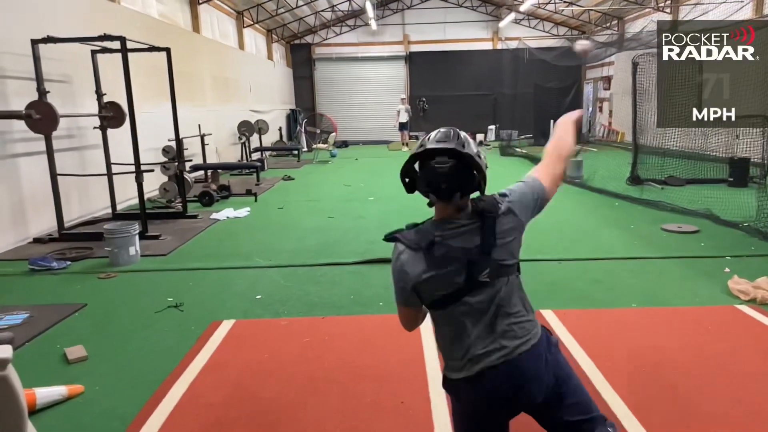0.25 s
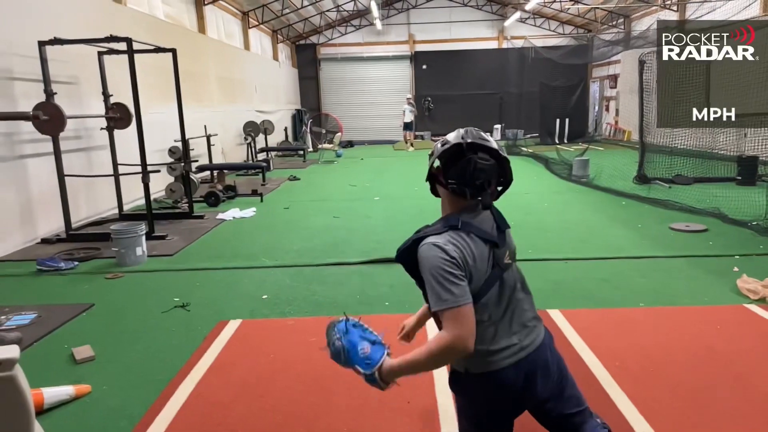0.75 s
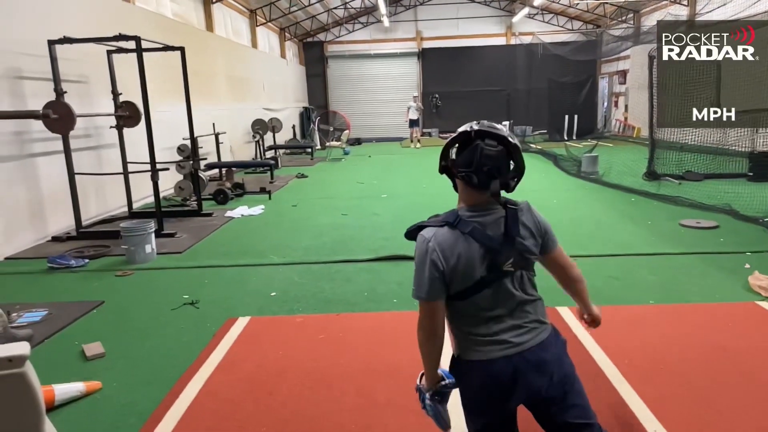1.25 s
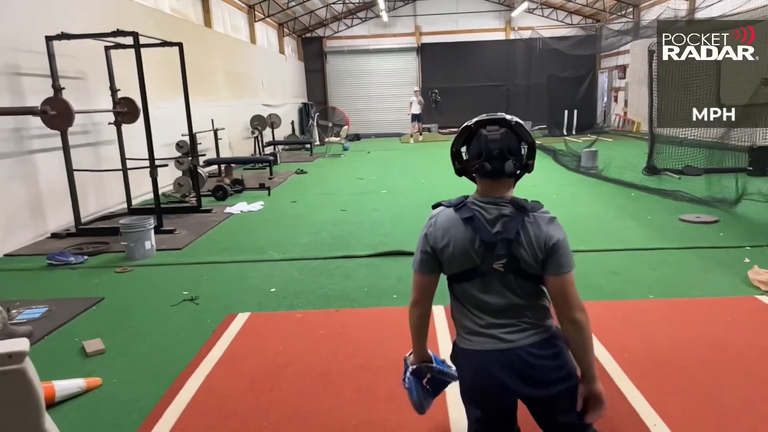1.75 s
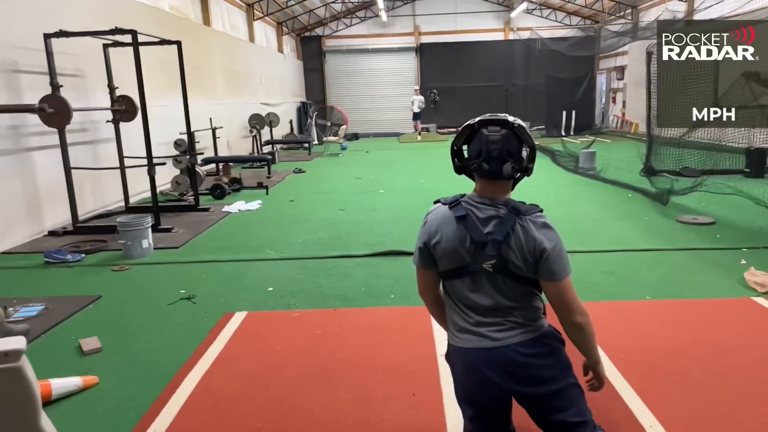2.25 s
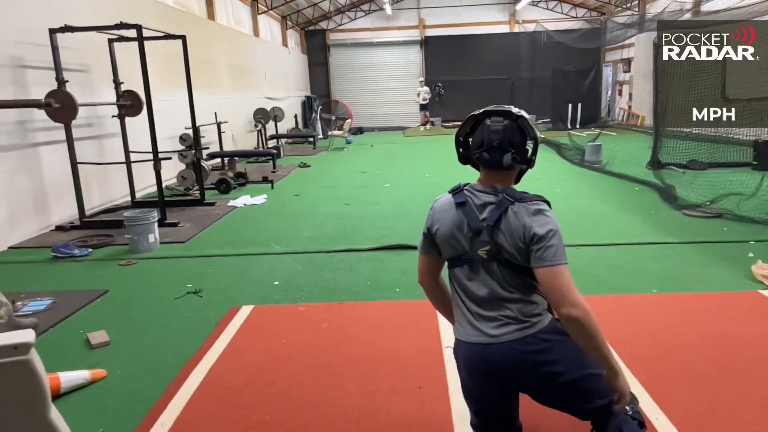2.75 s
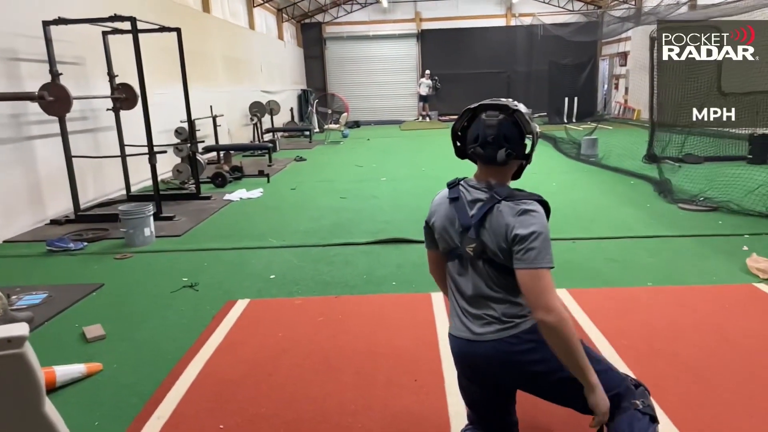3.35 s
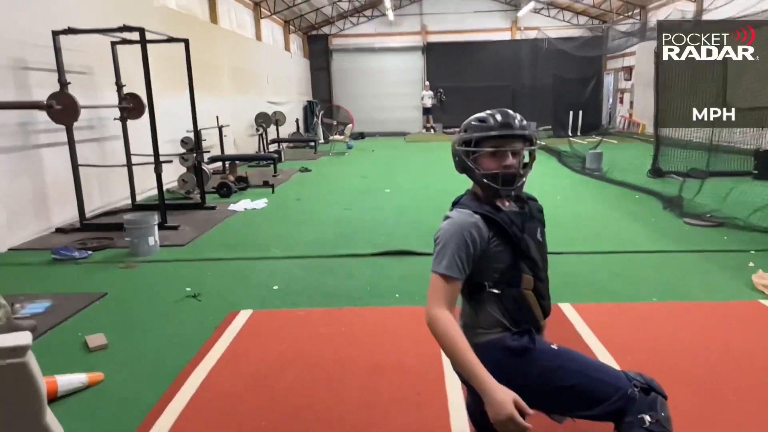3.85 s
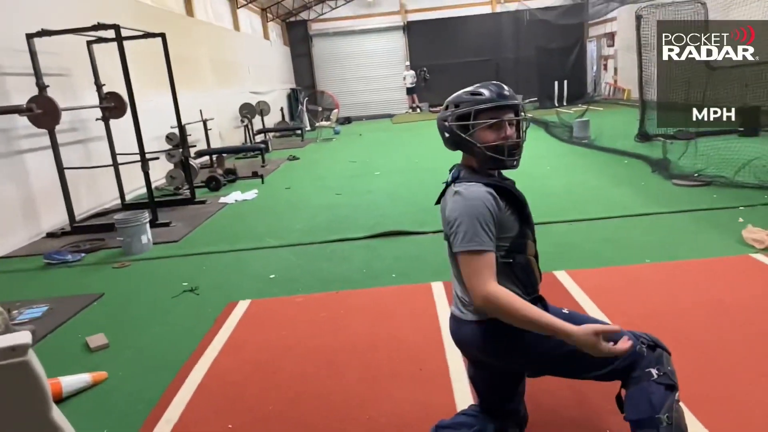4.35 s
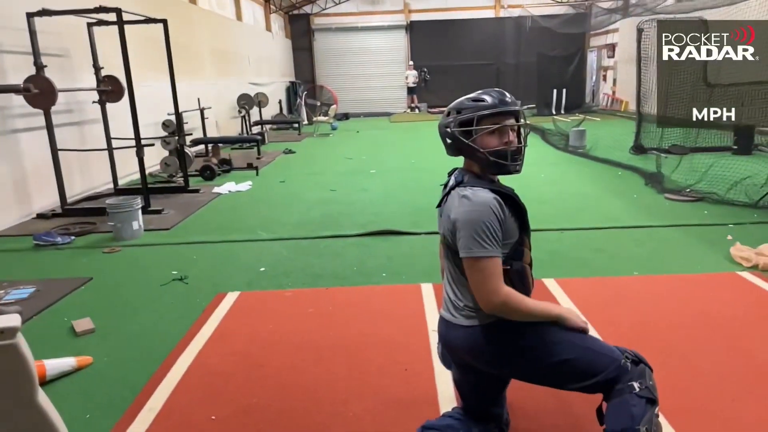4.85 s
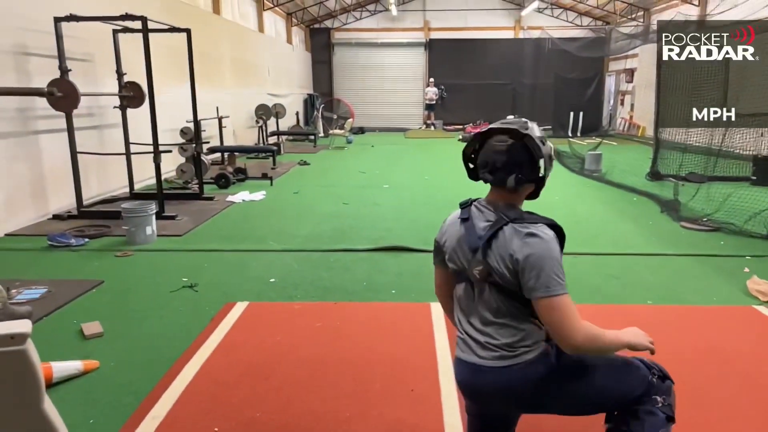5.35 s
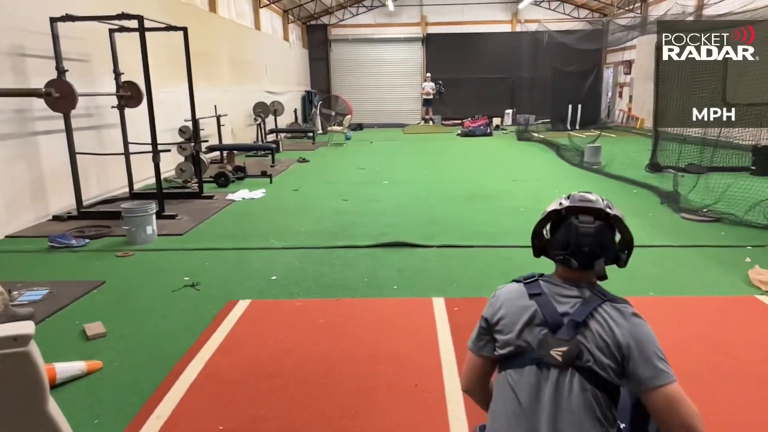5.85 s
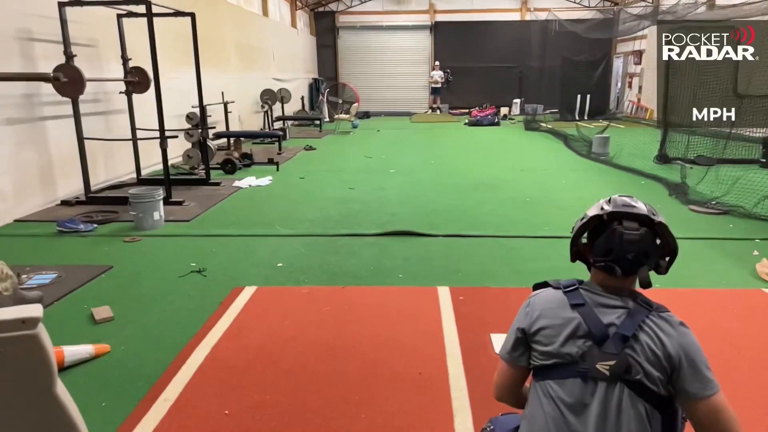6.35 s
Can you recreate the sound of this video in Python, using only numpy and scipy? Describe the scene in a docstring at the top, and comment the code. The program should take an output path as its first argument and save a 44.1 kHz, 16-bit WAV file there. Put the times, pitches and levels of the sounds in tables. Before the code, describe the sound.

Close to the microphone, plastic guards knock and clothing rustles as a catcher throws. About a second in, a baseball hits a distant leather mitt with a very loud sharp crack, and the big hall rings with quick echoes. A faint steel clink follows during a lull, then gear ticks, soft thuds and a run of light plastic knocks. Airy room noise and low engine drone continue underneath.

```python
"""Plastic guards knock and clothes rustle over hall air and engine drone; then a baseball cracks into a mitt.
The steel-roofed hall rings with the catch; steel clinks further off; the catcher throws and shifts.
Mitt: damped sines plus echoes. Steel: ringing modes plus scrape noise. Guards, buckles: decaying noise bursts.
Cloth, thuds, air, rumble: shaped noise. Engines: two gliding harmonics. The sound has brief regular gaps."""
import sys
import numpy as np
from scipy import signal
from scipy.fft import rfft, irfft, next_fast_len
from scipy.io import wavfile
from scipy.ndimage import uniform_filter1d, map_coordinates

SR = 44100
rng = np.random.default_rng(int(sys.argv[2]) if len(sys.argv) > 2 else 0)


def wrap_up_sound(samples):
    """Save the sound to the file named by the first command line argument, as 16-bit audio."""
    columns = np.atleast_2d(samples).T
    # keep every value between -1 and 1, then stretch to whole-number steps
    tamed = np.clip(columns, -1, 1)
    steps = np.round(tamed * 32767).astype(np.int16)
    wavfile.write(sys.argv[1], SR, steps)


N = 290442


def amp(db):
    """Decibels to gain."""
    return 10 ** (np.asarray(db) / 20)


def unit(x):
    """x at rms 1."""
    return x / np.sqrt(np.mean(x ** 2) + 1e-20)


def unit_energy(x):
    """x at energy 1."""
    return x / np.linalg.norm(x)


def along(points, hz):
    """(f/Hz, value) points interpolated on a log-frequency axis."""
    f, value = np.transpose(points)
    return np.interp(np.log(hz + 1), np.log(f + 1), value)


def over_time(points):
    """(t/s, value) points interpolated over the scene."""
    return np.interp(np.arange(N) / SR, *np.transpose(points))


def wobble(knots_per_s, size=N):
    """Smooth random curve: a spline through Gaussian knots."""
    knots = rng.standard_normal(int(size * knots_per_s / SR) + 4)
    return map_coordinates(knots, [np.arange(size) * knots_per_s / SR])


def swell(top_s, length_s):
    """Gaussian gain, 1 at top_s, 1/e at length_s to either side."""
    return np.exp(-((np.arange(N) / SR - top_s) / length_s) ** 2)


def add(track, at_s, sound):
    """Mix a sound into the track at at_s."""
    start = max(round(at_s * SR), 0)
    track[start:start + len(sound)] += sound[:N - start]


def body(spectrum, resonances=(), size=8192):
    """Minimum-phase impulse response, energy 1: spectrum in dB per Hz plus resonance lifts."""
    hz = np.fft.rfftfreq(size, 1 / SR)
    db = along(spectrum, hz)
    for f, width_hz, lift_db in resonances:
        db = db + lift_db / (1 + (2 * (hz - f) / width_hz) ** 2)
    # folding the cepstrum makes the response causal
    cepstrum = irfft(np.log(amp(db)))
    cepstrum[1:size // 2] *= 2
    cepstrum[size // 2 + 1:] = 0
    return unit_energy(irfft(np.exp(rfft(cepstrum))))


def through(x, response):
    """x convolved with an impulse response, length kept."""
    return signal.fftconvolve(x, response)[:len(x)]


def noise(spectrum):
    """Steady coloured noise, rms 1."""
    return unit(through(rng.standard_normal(N), body(spectrum)))


def burst(t60_s, size=4096):
    """Exponentially dying noise: the many tiny contacts of one blow."""
    return rng.standard_normal(size) * amp(-60 * np.arange(size) / SR / t60_s)


# hall decay: f/Hz, t60/s
HALL_DECAY = [(120, 0.49), (300, 1.31), (800, 0.75), (2500, 0.68), (5000, 0.42), (9000, 0.54),
              (15000, 0.57)]


def hall_tail(build_s):
    """Diffuse hall response, energy 1: builds up, then each band decays at its own t60."""
    hz, t, bins = signal.stft(rng.standard_normal(SR + SR // 2), SR, nperseg=256)
    decay = amp(-60 * t / along(HALL_DECAY, hz)[:, None])
    tail = signal.istft(bins * decay, SR, nperseg=256)[1]
    tail *= 1 - np.exp(-(np.arange(len(tail)) / SR / build_s) ** 2)
    return unit_energy(tail)


def in_hall(x, wet_db, wall_hz=5000):
    """Sound plus hall response; turf and netting soak up the treble above wall_hz."""
    lowpass = signal.butter(1, wall_hz, fs=SR, output="sos")
    return x + amp(wet_db) * through(signal.sosfilt(lowpass, x), hall_tail(build_s=0.027))


# low rumble spectrum: f/Hz, level/dB per Hz
RUMBLE_SPECTRUM = [(18, -49), (26, -37), (35, -10), (55, -2), (75, 3), (100, 1), (125, 0.5), (160, -8.5),
                   (200, -11), (280, -23), (450, -34), (1500, -100)]


def rumble(level_db=-45.5):
    """Steady low-frequency noise."""
    return amp(level_db) * noise(RUMBLE_SPECTRUM)


# air noise spectrum: f/Hz, level/dB per Hz
AIR_SPECTRUM = [(150, -2.5), (260, 3.5), (400, -3), (700, -2), (1500, -5), (3050, -4.5), (3900, -16),
                (5600, -13.5), (7000, -15.5), (8700, -9.5), (10300, -21.5), (12500, -29.5), (14800, -24.5),
                (16500, -28)]
# air noise mean level: t/s, level/dB
AIR_LEVEL = [(0, -52.5), (5.5, -52.5), (6, -55.5), (6.59, -56.5)]


def hall_air(waver_db=0.4):
    """Broadband noise of the hall's air, slowly wavering."""
    return amp(over_time(AIR_LEVEL) + waver_db * wobble(3.34)) * noise(AIR_SPECTRUM)


def engine(pitch_hz, waver_db, octave_db):
    """Firing tone and its octave; the walls leave little else."""
    phase = 2 * np.pi * np.cumsum(pitch_hz + 0.56 * wobble(12)) / SR
    tone = np.sin(phase) + amp(octave_db) * np.sin(2 * phase)
    return amp(waver_db * wobble(8.7)) * unit(tone)


# near engine gears: start/s, end/s, start f/Hz, climb/Hz per s
GEARS = [(0, 2.3, 78.6, 5.9), (2.52, 4.1, 87.75, 8.3), (4.72, 6.59, 72.4, 6)]
# near engine level before trim: t/s, level/dB
ENGINE_LEVEL = [(0.0, -47), (0.2, -46), (0.97, -34.5), (1.25, -42.5), (3.89, -42.5), (4.22, -44.5),
                (4.25, -52.5), (5.89, -44.5), (6.59, -56)]


def near_engine(trim_db=-1.0):
    """Pitch climbs steadily in each gear and sinks between gears."""
    corners = []
    for start_s, end_s, start_hz, climb in GEARS:
        corners += [(start_s, start_hz), (end_s, start_hz + climb * (end_s - start_s))]
    tone = engine(over_time(corners), waver_db=0.0, octave_db=-17.5)
    return amp(trim_db + over_time(ENGINE_LEVEL)) * tone


# farther engines: top t/s, length/s, f at top/Hz, level/dB
PASSES = [(0.508, 0.96, 112.5, -45), (4.068, 0.36, 111.5, -44.5), (5.047, .3, 119, -46),
          (6.097, 0.21, 128, -53)]
PASS_CLIMB_HZ_PER_S = 13


def far_engines():
    """Farther engines swell and fade as they speed up."""
    t = np.arange(N) / SR
    track = np.zeros(N)
    for top_s, length_s, hz, db in PASSES:
        pitch_hz = hz + PASS_CLIMB_HZ_PER_S * (t - top_s)
        track += amp(db) * swell(top_s, length_s) * engine(pitch_hz, waver_db=2.5, octave_db=-27)
    return track


# weight landing on the turf: top t/s, level/dB
THUDS = [(3.68, -39), (3.88, -39), (5.93, -44)]
# padded turf spectrum: f/Hz, level/dB per Hz
TURF_SPECTRUM = [(30, -34), (45, -6), (62, 0), (90, -2), (160, -17), (500, -68)]


def thuds(length_s=0.049):
    """Knees and feet press into padded turf: soft low-noise bumps."""
    gain = sum(amp(db) * swell(top_s, length_s) for top_s, db in THUDS)
    return gain * noise(TURF_SPECTRUM)


# catcher's moves, before trims: top t/s, length/s, rub level/dB, swish level/dB
STROKES = [(0.023, 0.12, -48, -48), (0.273, 0.1, -43, -45), (0.666, 0.049, -40.5, -53),
           (0.804, 0.75, -49, -63.5), (1.87, 0.06, -55, -52), (3.22, 0.071, -49, -62),
           (3.66, 0.062, -47.5, -43), (3.82, 0.088, -51, -45.5), (4.176, 0.063, -52, -54),
           (5.178, 0.063, -43, -42), (5.4, 0.62, -52, -56), (5.79, 0.11, -42.5, -52.5),
           (6.187, 0.1, -47, -55.5)]
# pads on turf: f/Hz, level/dB per Hz
RUB_SPECTRUM = [(150, -10.5), (350, -8.5), (600, -5), (1000, -5), (1500, -3.5), (1900, 0), (2400, -4),
                (3000, -6.5), (3900, -15.5), (6000, -41), (9000, -48)]
# jersey: f/Hz, level/dB per Hz
SWISH_SPECTRUM = [(2500, -14), (4000, -2.5), (6000, -2), (7200, -3.5), (8700, 1), (10000, -5.5),
                  (12500, -21), (15000, -11), (16500, -32)]
# pads rub round each knock: level re clack, delay, length
KNOCK_RUB_DB, KNOCK_RUB_LAG_S, KNOCK_RUB_S = -13, 0.026, 0.076


def cloth(grain_db=2, rub_trim_db=-1, swish_trim_db=-1):
    """Moves and knocks rub pads and turf, moves swish the jersey; stick-slip grain on both."""
    rub_power, swish_power = np.zeros(N), np.zeros(N)
    for top_s, length_s, rub_db, swish_db in STROKES:
        move = swell(top_s, length_s)
        rub_power += (move * amp(rub_db)) ** 2
        swish_power += (move * amp(swish_db)) ** 2
    for at_s, clack_db, *_ in KNOCKS:
        move = swell(at_s + KNOCK_RUB_LAG_S, KNOCK_RUB_S)
        rub_power += (move * amp(clack_db + KNOCK_RUB_DB)) ** 2
    rub = amp(rub_trim_db) * np.sqrt(rub_power) * noise(RUB_SPECTRUM)
    swish = amp(swish_trim_db) * np.sqrt(swish_power) * noise(SWISH_SPECTRUM)
    grain = amp(grain_db * wobble(250) + 1.2 * wobble(30))
    return in_hall((rub + swish) * grain, wet_db=-9.5)


# buckle ticks: t/s, energy level/dB
BUCKLE_TICKS = [(3.583, -18.5), (3.6565, -1.5), (3.848, -4), (3.860, -14)]
# buckle spectrum: f/Hz, level/dB per Hz
BUCKLE_SPECTRUM = [(300, -19), (2500, -14.5), (5000, -20), (8500, -2), (11500, -18), (15000, -17),
                   (17000, -13)]


def buckles(tick_t60_s=0.003):
    """Small hard ticks, close and dry: very short coloured bursts."""
    track = np.zeros(N)
    for at_s, db in BUCKLE_TICKS:
        tick = through(burst(tick_t60_s), body(BUCKLE_SPECTRUM))
        add(track, at_s, amp(db) * unit_energy(tick))
    return track


# steel modes: f/Hz, relative level/dB, t60/s
STEEL_MODES = [(684, -11.5, 0.58), (1070, -11.5, 0.29), (1575, -4, 0.16), (1923, -0.5, 0.51),
               (3266, -3.5, 0.39), (4452, -5, 0.14), (5146, -5.5, 0.22), (6200, -13, 0.36),
               (6570, -12, 0.33), (8140, 0.5, 0.27), (9055, -7, .2), (14620, -22, .3)]
# steel contacts: t/s, ring level/dB, scrape level/dB
CLINKS = [(2.488, -42, -28.5), (2.4923, -45, -35), (2.5, -55, -44), (2.507, -50, -30), (2.518, -39, -35)]
# steel on steel: f/Hz, level/dB per Hz
SCRAPE_SPECTRUM = [(600, -49), (1600, -7), (3000, -4.5), (7000, -8.5), (11500, -12), (15000, -16.5)]
# damped scrape resonances: f/Hz, width/Hz, lift/dB
SCRAPE_RESONANCES = [(1610, 130, 14.5), (4580, 340, 10), (8770, 1900, 18)]


def steel():
    """Steel chatters on steel; each contact feeds energy into the modes and scrapes."""
    ring, scrape, t = np.zeros(N), np.zeros(N), np.arange(N) / SR
    for hz, mode_db, t60_s in STEEL_MODES:
        energy = np.zeros(N)
        for at_s, ring_db, _ in CLINKS:
            add(energy, at_s, amp(ring_db + mode_db - 60 * t[:SR] / t60_s) ** 2)
        # echoes blur level and phase
        flutter = amp(1.4 * wobble(60))
        ring += np.sqrt(energy) * flutter * np.sin(2 * np.pi * hz * t + 0.55 * wobble(90))
    for at_s, _, scrape_db in CLINKS:
        add(scrape, at_s, amp(scrape_db) * burst(t60_s=0.061))
    scrape = through(scrape, body(SCRAPE_SPECTRUM, SCRAPE_RESONANCES))
    return ring + in_hall(scrape, wet_db=-4.5)


# guard bands, in order thud, clack, edge: low f/Hz, high f/Hz, t60/s
SHELL_BANDS = [(400, 1530, 0.22), (1570, 3370, 0.13), (3250, 13400, 0.085)]
# plastic spectrum: f/Hz, level/dB per Hz
PLASTIC_SPECTRUM = [(200, -6), (600, -3), (1200, -4), (2100, 5), (2900, 3), (3800, -11), (5600, -10),
                    (7000, -13.5), (8800, 0), (11500, -25.5), (16000, -34)]


def contact(levels_db, tick_db=5, tick_t60_s=0.0058, grain_db=3):
    """One blow on a plastic shell: uneven chatter, random resonances; the edge band dies first."""
    resonances = [(hz, 150, 7) for hz in rng.uniform(600, 6210, size=12)]
    colour = body(PLASTIC_SPECTRUM, resonances)
    size = SR // 2
    knock = np.zeros(size)
    for db, (low_hz, high_hz, t60_s) in zip(levels_db, SHELL_BANDS):
        band = signal.butter(3, [low_hz, high_hz], "band", fs=SR, output="sos")
        chatter = unit(amp(grain_db * wobble(699, size)))
        contacts = chatter * burst(t60_s, size) + amp(tick_db) * burst(tick_t60_s, size)
        blow = signal.sosfilt(band, through(contacts, colour))
        knock += amp(db) * blow / np.std(blow[:SR // 64])  # level set by the attack
    return knock


# guard knocks, before trim: t/s, clack level/dB, then thud, edge, rebound levels/dB re clack
KNOCKS = [(0.003, -33, -10, -9, -3), (0.113, -46.5, 3, -8, -4), (0.251, -37, -7, -3.5, 4.5),
          (0.507, -50, -3, -9, 0), (0.581, -39.5, -8, -3, -1), (0.608, -38, -9, -3, 0.5),
          (0.646, -38, -9, -5.5, 0), (3.159, -52, 3, -11, 1), (3.777, -38.5, -7, -14, 4),
          (3.958, -48.5, 4.5, -4, 0), (4.022, -42, -3.5, 4.5, 3.5), (4.287, -42.5, 2.5, -3, 5),
          (4.356, -42, -3.5, -2, 0.5), (4.42, -39, -5, -5.5, -2.5), (4.488, -41, -12, -10.5, -13),
          (4.595, -43, 0, -22, -4), (4.654, -42, 0.5, -12.5, -6), (4.712, -37.5, -6.5, -7, 6),
          (4.901, -43, -6, -14, -10.5), (4.954, -45, 0, -5.5, -3.5), (5.048, -48.5, 5, -11, 0),
          (5.209, -35.5, -15, -13, 0.5)]
REBOUND_LAG_S = .0185
# rebound offsets for thud, clack, edge
REBOUND_OFFSETS_DB = np.array([-7, 0, -3])
REBOUND_SHARES = np.array([.65, 1, .65])  # how far each band follows the rebound level


def guards(trim_db=1, wet_db=-7):
    """Each shell strikes, swings back and strikes again with its own balance of bands."""
    track = np.zeros(N)
    for at_s, clack_db, thud_db, edge_db, rebound_db in KNOCKS:
        first_db = clack_db + np.array([thud_db, 0, edge_db])
        second_db = first_db + rebound_db * REBOUND_SHARES + REBOUND_OFFSETS_DB
        add(track, at_s, in_hall(contact(first_db), wet_db))
        add(track, at_s + REBOUND_LAG_S, in_hall(contact(second_db), wet_db))
    return amp(trim_db) * track


CATCH_S = 1.1516
# leather crack modes: f/Hz, width/Hz, level/dB
POCKET_MODES = [(1230, 160, 6), (2920, 510, -2), (8530, 550, -3)]


def mitt_crack(peak_db=2.0, slap=0.61, slap_lag_s=.0005, crumple_db=-16):
    """The leather cracks in damped modes and crumples round the ball at once; a second slap follows at once."""
    track, t = np.zeros(N), np.arange(SR // 20) / SR
    crack = np.zeros(len(t))
    for hz, width_hz, db in POCKET_MODES:
        decay = width_hz * np.exp(-np.pi * width_hz * t)
        crack += amp(db) * decay * np.sin(2 * np.pi * hz * t)
    crack *= -amp(peak_db) / np.abs(crack).max()  # peak before the band-pass
    crumple = through(burst(t60_s=0.021), unit_energy(crack))
    add(track, CATCH_S, crack)
    add(track, CATCH_S, amp(crumple_db) * crumple)
    add(track, CATCH_S + slap_lag_s, slap * crack)
    band = signal.butter(4, [500, 10000], "band", fs=SR, output="sos")
    return signal.sosfilt(band, track)


# clear wall and roof echoes: t/s, relative level/dB
WALL_ECHOES = [(1.1638, -0.5), (1.1690, 0), (1.1795, -3), (1.1870, 0.5), (1.2150, -4.5), (1.2997, -13)]
# smack thrown into the hall: f/Hz, level/dB per Hz
SMACK_SPECTRUM = [(70, -45), (115, -14.5), (170, -8), (230, -11), (340, -11.5), (460, -12), (650, -4),
                  (820, -1), (1300, -10), (3050, -9), (4600, -29.5), (6200, -27), (8700, -23),
                  (11800, -52.5), (16000, -50)]
# mitt and hall resonances: f/Hz, width/Hz, lift/dB
SMACK_RESONANCES = [(273, 35, 7), (782, 22, 3), (870, 22, 0.5), (1132, 44, 5.5), (1340, 36, 0),
                    (1630, 23, 0), (1717, 41, 4), (2100, 33, 0), (2810, 150, -5), (9200, 1200, 2.5)]


def mitt_echoes(tail_db=20.0, echo_db=9, scatter_t60_s=0.017):
    """Hall's answer to the smack: diffuse tail plus echoes smeared by racks and roof beams."""
    track = np.zeros(N)
    add(track, CATCH_S, amp(tail_db) * hall_tail(build_s=0.011))
    for at_s, db in WALL_ECHOES:
        add(track, at_s, amp(echo_db + db) * unit_energy(burst(scatter_t60_s)))
    return through(track, body(SMACK_SPECTRUM, SMACK_RESONANCES))


def mitt():
    """The catcher's body shields the microphone, so the hall's answer carries most of the smack."""
    return mitt_crack() + mitt_echoes()


def scene():
    """All sources at one microphone."""
    background = rumble() + hall_air() + near_engine() + far_engines()
    catcher = thuds() + cloth() + buckles() + guards()
    return (background + catcher + steel() + mitt())[None]


# gap lengths before edge smoothing: length/s
GAP_LENGTHS_S = [.006, .004, .002, .011, .005, .004]
GAP_FIRST_S, GAP_EVERY_S = .547, 1.024  # gap centres
TOP_HZ = 16100


def record(dry):
    """Sound drops out briefly about once a second; peaks are rounded, the band ends at TOP_HZ."""
    t = np.arange(N) / SR
    gate = np.ones(N)
    for k, length_s in enumerate(GAP_LENGTHS_S):
        centre_s = GAP_FIRST_S + k * GAP_EVERY_S
        gate[np.abs(t - centre_s) < length_s / 2] = 0
    gated = dry * uniform_filter1d(gate, size=44)  # 1 ms edges
    rounded = gated / (1 + gated ** 8) ** (1 / 8)
    size = next_fast_len(N + SR // 4)
    passed = np.fft.rfftfreq(size, 1 / SR) < TOP_HZ
    return irfft(rfft(rounded, size) * passed, size)[..., :N]


dry = scene()
out = record(dry)
wrap_up_sound(out)
```